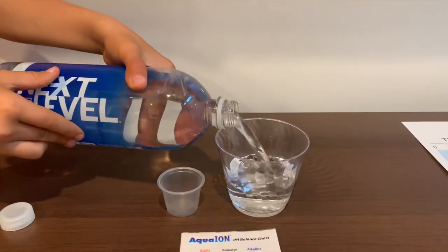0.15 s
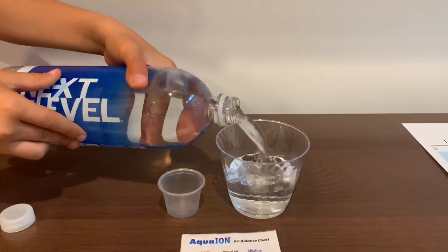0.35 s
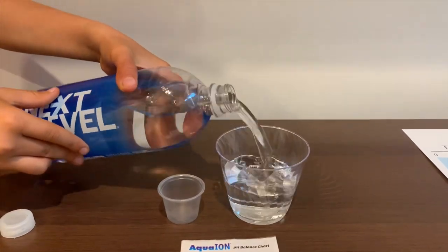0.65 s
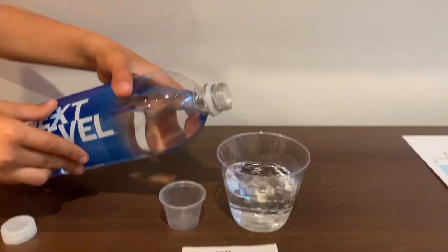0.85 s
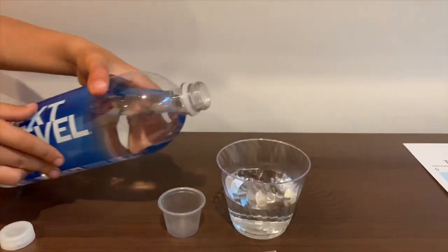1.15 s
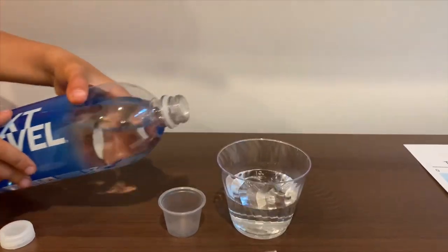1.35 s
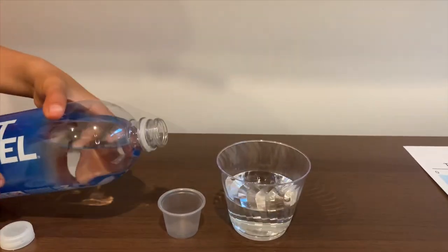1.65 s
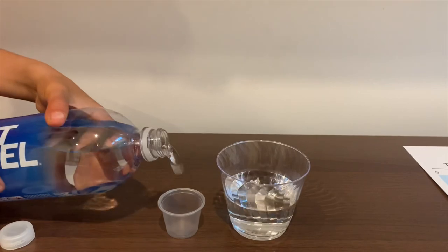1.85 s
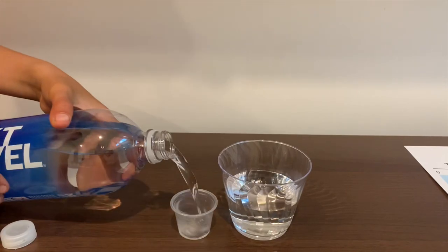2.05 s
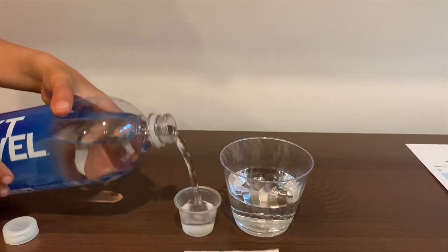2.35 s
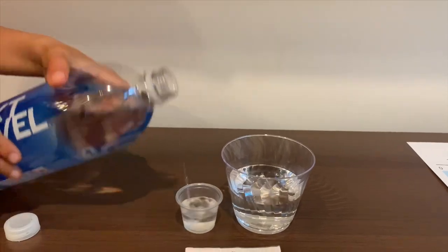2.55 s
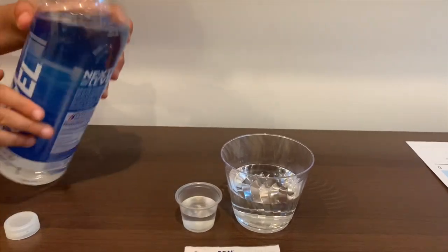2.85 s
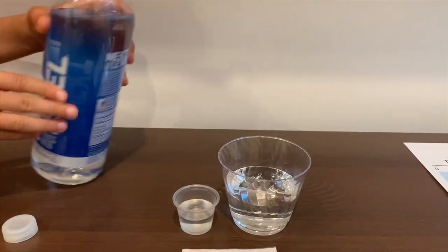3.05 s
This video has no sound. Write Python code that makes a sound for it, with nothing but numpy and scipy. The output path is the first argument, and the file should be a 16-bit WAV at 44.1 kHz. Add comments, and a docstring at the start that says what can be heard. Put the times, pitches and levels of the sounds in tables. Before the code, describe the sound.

Water pours from a plastic bottle into a half-full plastic cup, with irregular glugs, bright bubble plinks and ticking drops until about 0.9 seconds. Soft table bumps come near 0.9 and 1.4. A thin stream patters into a small empty cup from 2.0 to 2.6, its faint note rising, ending with drips. At 3.1 the bottle lands with a hollow wooden double thud. Low appliance hum and soft ventilation continue throughout.

```python
"""Water glugs from a plastic bottle into a half-full plastic cup, then a thin stream patters into a small empty one.
Gulps are noisy slaps through the cup's ringing; bubbles are dying tones that climb a little, big and fine.
Spray, splashes and patter are short bursts of coloured noise, and a faint blurred note climbs as the cup fills.
The wooden table is bumped twice and sways, and at the end the bottle is set down on it: dying tones and noise.
An appliance hums in the small room, as wavering tones over soft ventilation noise."""
import sys
import numpy as np
from scipy import signal
from scipy.fft import rfft, irfft
from scipy.io import wavfile
from scipy.ndimage import uniform_filter1d, map_coordinates

SR = 44100
rng = np.random.default_rng(int(sys.argv[2]) if len(sys.argv) > 2 else 0)


def dump(signal):
    """Clip the signal to [-1, 1] and save it as 16-bit WAV at the path in sys.argv[1]."""
    limited = np.clip(np.atleast_2d(signal).T, -1, 1)
    pcm = np.round(limited * 32767).astype(np.int16)
    wavfile.write(sys.argv[1], SR, pcm)


N = 141120

# hum tones of the appliance (f/Hz, level/dB, waver as a share)
HUM_TONES = [(56.5, -59.5, 1), (115.6, -62, 0.12), (169.44, -49.5, 0.35), (361.4, -73, 0.85),
             (595, -71, 0.21), (874, -79, 0.18)]
# how fast the hum wavers, as a spectrum (f/Hz, level/dB)
HUM_WAVER = [(1, 0), (6, -3), (16, -20), (60, -90)]
# colour of the ventilation noise (f/Hz, relative level/dB per Hz)
AIR_COLOUR = [(20, -2.5), (35, -15), (52, 5), (80, -2.5), (130, -8.5), (200, -2.5), (260, -10),
              (350, -11.5), (450, -17.5), (650, -18.5), (1000, -27), (2000, -38), (3500, -47.5),
              (9000, -50), (15000, -56.5)]
AIR_DB = -52
# how alike left and right are (f/Hz, likeness from 0 to 1)
LIKENESS = [(60, 0.99), (130, 0.74), (290, 0.84), (640, 0.45), (1400, 0.011), (15000, 0.035)]
# how long the room's tail lasts (f/Hz, t60/s: time to fall 60 dB)
ROOM_T60 = [(100, 0.77), (400, 0.34), (1500, 0.42), (4000, 0.37), (8000, 0.25), (16000, 0.23)]
EARLY_S = 0.0004  # the quick scatter starts after this
# echoes off the cup's wall, the table and the wall behind (left delay/s, right delay/s, level/dB)
ECHOES = [(.0009, .00096, -13), (.0023, .0022, -19.5), (.0049, 0.0046, -14)]
EDGE_HZ = 15900  # the treble is cut off here

# knocks on the table (t/s, level/dB, sway/dB before doubling, contact click/dB)
KNOCKS = [(0.896, -32.5, -36.5, -60), (0.9423, -37.5, -41.5, -84), (1.411, -34, -38, -64),
          (1.459, -38.5, -37, -72), (3.0743, -21, -18.5, -43), (3.141, -28, -50, -52.5),
          (3.187, -27, -25.5, -53)]
# tones the table top rings with (f/Hz, relative level/dB, t60/s)
TABLE_MODES = [(173, -3.5, 0.095), (214, -8, 0.16), (349.3, -2, 0.091), (421, -12, 0.15), (497, -26, 0.092),
               (617, -7, 0.08), (786, -12.5, 0.049), (898, -12.5, 0.051), (1108, -24, 0.15),
               (1280, -27, 0.074), (1595, -19, 0.084)]
# colour of the rattle (f/Hz, level/dB)
RATTLE_COLOUR = [(100, 2), (240, 3.5), (350, -10), (700, -11), (1500, -14.5), (2500, -21.5), (4000, -25.5),
                 (8000, -45.5), (16000, -60)]
RATTLE_DB, RATTLE_T60_S, RATTLE_RISE_S = -10, 0.16, 0.007  # level is relative to the knock
# the blow itself: a hollow tone inside a short bell-shaped swell
THOCK_HZ, THOCK_DB, THOCK_PEAK_S, THOCK_WIDTH_S = 420, 3.5, 0.0025, 0.0017
THOCK_DELAY_S = 0.00079
SWAY_HZ, SWAY_T60_S, SWAY_RISE_S, SWAY_LAG_S = 43.8, 0.4, 0.0051, 0.0093

# drops of spray on plastic (t/s, level/dB, brightest f/Hz)
TICKS = [(0.266, -61, 12900), (0.374, -53, 12200), (0.596, -53.5, 9000), (0.644, -46.5, 11000),
         (0.648, -47, 7160), (0.665, -38.5, 8450), (0.681, -51, 8000), (0.6883, -46.5, 10100),
         (0.8104, -56.5, 15600), (0.8818, -49.5, 9700), (1.053, -57, 6960), (1.1218, -61, 8900),
         (1.1623, -53.5, 8000), (1.281, -66, 12400), (1.993, -47, 10800), (1.995, -45.5, 8950),
         (2.069, -50, 9100), (2.2252, -57.5, 11300), (2.461, -77, 12330), (2.548, -44.5, 8700),
         (2.597, -58, 13040), (2.6277, -52.5, 15500), (2.8077, -60.5, 8300)]
# colour of a tick before it is tilted towards its brightest pitch (f/Hz, level/dB)
TICK_COLOUR = [(1500, -2.5), (4000, 6), (5500, 5.5), (7300, 10.5), (9000, 1.5), (10500, -17.5),
               (12500, 7.5), (16000, -5)]
TICK_T60_S, TICK_OCTAVES = 0.009, 0.65  # 6 dB weaker for each TICK_OCTAVES away from the brightest pitch

# water drumming on the small cup's thin floor and wall (t/s, level/dB, t60/s)
PATTERS = [(1.993, -51.5, 0.12), (2.011, -53, 0.26), (2.03, -57, 0.18), (2.551, -40.5, 0.029),
           (2.571, -50, 0.042), (2.595, -47.5, 0.07), (2.602, -42, 0.052), (2.607, -56, 0.03),
           (2.623, -56.5, 0.28)]
# colour of the drumming (f/Hz, level/dB)
PATTER_COLOUR = [(150, 9), (450, -2), (750, 3.5), (1200, -6), (1550, 2), (1750, -11.5), (2100, -7.5),
                 (4300, -22), (5600, -25.5), (7200, -38), (10500, -60), (13000, -22.5), (16000, -22.5)]
# wet splashes of the stream on the water (t/s, level/dB, t60/s)
SPLASHES = [(0.104, -49, 0.037), (0.153, -51, 0.021), (2.005, -64.5, 0.083), (2.179, -53, 0.059),
            (2.224, -56.5, 0.071), (2.24, -56.5, 0.13), (2.594, -51, 0.077), (2.602, -43.5, 0.061),
            (2.624, -64, 0.32)]
# colour of the splashes (f/Hz, level/dB)
SPLASH_COLOUR = [(800, 9.5), (1500, 1), (3000, 4), (4400, 3.5), (5500, -25), (7500, -14), (16000, -67)]
# the note of the air in the small cup as it fills (t/s, f/Hz, level/dB of its blur)
FILLING = [(2.2, 620, -76), (2.32, 720, -69), (2.39, 860, -62), (2.45, 890, -65), (2.52, 960, -82)]
# the slow noise that blurs that note (f/Hz, level/dB)
FILLING_BLUR = [(1, 0), (50, 0), (130, -18), (400, -70)]

# loudness of the fine bubbles under the stream (t/s, level/dB)
FLOW = [(0, -62.5), (.14, -71), (.3, -74.5), (.45, -69), (.7, -70.5), (.9, -76), (1.05, -82), (1.3, -80.5),
        (1.95, -96), (2.05, -80), (2.3, -87), (2.45, -81.5), (2.65, -78.5), (2.9, -85)]
# colour of the fine bubbles (f/Hz, level/dB)
FIZZ_COLOUR = [(600, 4.5), (1200, -8.5), (2000, -7), (3500, -1.5), (5200, -7.5), (7500, 0), (10000, -29.5),
               (14000, -7)]
FIZZ_PER_S, FIZZ_SPREAD_DB, FIZZ_RISE_S = 1600, 4.5, 0.0003
FIZZ_T60_S = 0.009  # for a bubble at 2000 Hz

# loudness of the mid-sized bubbles churning in the big cup (t/s, gain/dB)
GURGLE_LEVEL = [(0, -63.5), (.12, -62.5), (.3, -70.5), (.42, -67), (0.601, -66.5), (.72, -60.5), (.9, -61),
                (1.0, -73), (1.149, -80)]
GURGLE_COUNT, GURGLE_T60_S = 200, 0.028
GURGLE_HZ, GURGLE_OCTAVES, GURGLE_SPREAD_DB = 1750, 0.42, 3.5  # middle pitch, random spread of pitch and level

# single bubbles (t/s, f/Hz at the start, level/dB before flutter, t60/s)
BUBBLES = [(0.083, 3620, -53, 0.063), (0.106, 2560, -51, 0.023), (0.153, 3790, -53, 0.027),
           (0.208, 303, -63, 0.13), (0.206, 1213, -33.5, 0.012), (0.208, 1987, -50.5, 0.033),
           (0.209, 2300, -49.5, 0.033), (0.376, 1345, -41.5, 0.021), (0.378, 395, -44, 0.11),
           (0.388, 3640, -49.5, 0.027), (0.390, 3310, -43.5, 0.017), (0.4951, 3102, -41, 0.025),
           (0.498, 3216, -42.5, 0.03), (0.495, 642, -45, 0.24), (0.498, 7860, -53, 0.023),
           (0.5642, 7470, -52.5, 0.017), (0.686, 342, -43, 0.21), (0.689, 1834, -45, 0.045),
           (0.694, 1584, -42.5, 0.025), (0.746, 1630, -53.5, 0.081), (0.848, 1856, -39.5, 0.019),
           (0.871, 2830, -42.5, 0.019), (0.874, 2424, -45, 0.061), (0.884, 1910, -43, 0.022),
           (2.245, 3530, -63, .04), (2.603, 2866, -55, 0.028), (2.623, 465, -44, 0.066),
           (2.676, 444, -47, 0.059)]
BUBBLE_RISE_S = 0.00099
BUBBLE_GLIDE = 0.028  # share the pitch climbs in one t60; it stops after two
BUBBLE_WOBBLE, BUBBLE_FLUTTER_DB = 0.045, 3  # churning water shakes the pitch (share) and the level

# gulps landing in the big cup (t/s, level/dB before length scaling, length/s, highest f/Hz)
GULPS = [(0.172, -48.5, 0.05, 1310), (0.202, -36.5, 0.0065, 1400), (0.206, -40, 0.008, 2130),
         (0.342, -49.5, 0.008, 910), (0.371, -38.5, 0.011, 1874), (0.494, -41.5, 0.0046, 1900),
         (0.516, -45.5, 0.0033, 2300), (0.646, -46.5, 0.008, 1440), (0.681, -48, 0.015, 3305),
         (0.848, -50.5, 0.043, 2300)]
# water and cup ring with (f/Hz, width/Hz, relative level/dB)
CUP_MODES = [(301, 122, 14), (413.7, 270, 5), (650.5, 45, 4), (801, 77, 0), (1083, 140, -5),
             (1315, 95, -4.5), (1638, 155, 3), (1935, 69, 3.5), (2325, 34, 0.5), (2835, 960, 7)]


def amp(db):
    """Turns decibels into gain."""
    return 10 ** (np.asarray(db) / 20)


def unit(x):
    """Scales a sound to an rms (average strength) of 1."""
    return x / np.sqrt(np.mean(x ** 2) + 1e-20)


def read(points, hz):
    """Reads a table between its points, on a log-frequency axis."""
    f, value = np.transpose(points)
    return np.interp(np.log(hz + 1), np.log(f + 1), value)


def add(mix, s, sound):
    """Mixes a sound in at time s."""
    part = mix[max(round(s * SR), 0):][:len(sound)]
    part += sound[:len(part)]


def clock(size):
    """Gives the sample times in seconds."""
    return np.arange(size) / SR


def fade(t, t60):
    """Falls 60 dB in t60 seconds."""
    return np.exp(-np.log(1000) * t / t60)


def noise(colour, size):
    """Makes noise of rms 1 with the given spectrum and random phases."""
    hz = np.fft.rfftfreq(size, 1 / SR)
    phases = np.exp(2j * np.pi * rng.random(len(hz)))
    return unit(irfft(amp(read(colour, hz)) * phases, size))


def pair(x):
    """Blends two unrelated channels into left and right, nearly alike in the bass."""
    z = rfft(x)
    same = np.clip(read(LIKENESS, np.fft.rfftfreq(x.shape[1], 1 / SR)), 0, 1)
    mid = z[0] * np.sqrt((1 + same) / 2)
    side = z[1] * np.sqrt((1 - same) / 2)
    return irfft(np.array([mid + side, mid - side]), x.shape[1])


def background():
    """Hum tones waver in strength and phase over soft ventilation noise."""
    t, hum = clock(N), np.zeros(N)
    for hz, db, waver in HUM_TONES:
        a, b = (noise(HUM_WAVER, N) for _ in range(2))
        wavering = 1 + waver * (a + 1j * b) / np.sqrt(2)
        tone = np.exp(2j * np.pi * (hz * t + rng.random()))
        hum += amp(db) * np.sqrt(2) * (wavering * tone).real
    air = pair(np.array([noise(AIR_COLOUR, N), noise(AIR_COLOUR, N)]))
    return hum + amp(AIR_DB) * air


def room(x, early_db, early_t60, tail_db, left_db, lag_s):
    """Adds quick scatter from cups and bottle and a small room's tail; the left side hears it all lag_s later."""
    t = clock(size=24576)
    taps = rng.standard_normal((2, len(t)))
    # the tail is noise in which each pitch dies at its own speed
    hz, when, z = signal.stft(taps, SR, nperseg=256)
    dying = z * fade(when, read(ROOM_T60, hz)[:, None])
    tail = signal.istft(dying, SR, nperseg=256)[1][:, :len(t)]
    tail = tail * np.minimum(t / 0.0028, 1)
    early = rng.standard_normal(taps.shape) * (t > EARLY_S) * fade(t, early_t60)
    echoes = pair(amp(early_db) * unit(early) + amp(tail_db) * unit(tail)) / np.sqrt(len(t))
    both = x + signal.fftconvolve(np.atleast_2d(x), echoes, axes=1)[:, :N]
    left = map_coordinates(both[0], [np.arange(N) - lag_s * SR], order=5)
    return np.array([left, both[1]]) * amp([[left_db / 2], [-left_db / 2]])


def echoed(x):
    """Adds distinct echoes of nearby surfaces, timed differently on each side."""
    out = np.array([x, x])
    for left_s, right_s, db in ECHOES:
        add(out[0], left_s, amp(db) * x)
        add(out[1], right_s, amp(db) * x)
    return out


def sway():
    """After a knock the whole table wobbles with a deep, dying thud."""
    out, t = np.zeros(N), clock(size=30000)
    swell = 1 - np.exp(-t / SWAY_RISE_S)
    thud = 2 * swell * fade(t, SWAY_T60_S) * np.sin(2 * np.pi * SWAY_HZ * t)
    for s, _, db, _ in KNOCKS:
        add(out, s + SWAY_LAG_S, -amp(db) * thud)
    return out


def tick(bright_hz):
    """A very short snap of thin plastic: noise strongest around one pitch."""
    t = clock(size=2048)
    colour = [(hz, db - 6 * abs(np.log2(hz / bright_hz)) / TICK_OCTAVES) for hz, db in TICK_COLOUR]
    return noise(colour, len(t)) * np.minimum(t / 0.00015, 1) * fade(t, TICK_T60_S)


def knocks():
    """A contact click comes first, then a hollow thock, the table top's ringing and a dull rattle."""
    out, t = np.zeros(N), clock(size=16384)
    wood = sum(amp(db) * fade(t, t60) * np.sin(2 * np.pi * hz * t) for hz, db, t60 in TABLE_MODES)
    swell = np.exp(-((t - THOCK_PEAK_S) / THOCK_WIDTH_S) ** 2)
    thock = amp(THOCK_DB) * swell * np.sin(2 * np.pi * THOCK_HZ * t)
    for s, db, _, click_db in KNOCKS:
        rattle = amp(RATTLE_DB) * noise(RATTLE_COLOUR, len(t)) * fade(t, RATTLE_T60_S)
        add(out, s, amp(db) * rattle * np.minimum(t / RATTLE_RISE_S, 1))
        add(out, s + THOCK_DELAY_S, -amp(db) * (thock + wood) * np.minimum(t / 0.001, 1))
        add(out, s - 0.001, amp(click_db) * tick(bright_hz=6760))
    return out


def spray():
    """Stray drops tick on the plastic cups."""
    out = np.zeros(N)
    for s, db, hz in TICKS:
        add(out, s, amp(db) * tick(hz))
    return out


def patter(bursts, colour, grain_db):
    """A thin stream lands in bursts of noise, grainy in level and dying away."""
    out, t = np.zeros(N), clock(size=12000)
    for s, db, t60 in bursts:
        bumps = unit(uniform_filter1d(rng.standard_normal(len(t)), size=90))
        grains = unit(amp(grain_db * bumps))
        burst = noise(colour, len(t)) * grains * np.minimum(t / 0.0004, 1) * fade(t, t60)
        add(out, s, amp(db) * burst)
    return out


def filling():
    """The air in the small cup gives a faint blurred note that climbs as the cup fills."""
    s, hz, db = np.transpose(FILLING)
    t = clock(N)
    blur = noise(FILLING_BLUR, N)
    note = np.sin(2 * np.pi * np.cumsum(np.interp(t, s, hz)) / SR)
    return np.interp(t, s, amp(db), left=0, right=0) * blur * note


def bubble(hz, t60, rise_s):
    """A trapped bubble swells into a wobbling, dying tone that climbs as it nears the surface."""
    t = clock(size=6000)
    wobble, flutter = unit(uniform_filter1d(rng.standard_normal((2, len(t))), size=110))
    climb = BUBBLE_GLIDE * np.minimum(t / t60, 2)
    turns = np.cumsum(hz * (1 + climb + BUBBLE_WOBBLE * wobble)) / SR
    shape = (1 - np.exp(-(t / rise_s) ** 2)) * fade(t, t60)
    return shape / shape.max() * amp(BUBBLE_FLUTTER_DB * flutter) * np.sin(2 * np.pi * turns)


def fizz():
    """Many tiny bubbles at random times follow the flow; small, high ones die sooner."""
    out = np.zeros(N)
    pitches = np.geomspace(600, 14000, 48)
    for hz in pitches:
        starts = rng.random(N) < FIZZ_PER_S / len(pitches) / SR
        hits = starts * amp(FIZZ_SPREAD_DB * np.minimum(rng.exponential(1, N), 4))
        tiny = bubble(hz, FIZZ_T60_S * (2000 / hz) ** 0.63, FIZZ_RISE_S)
        out += amp(read(FIZZ_COLOUR, hz)) * signal.oaconvolve(hits, tiny)[:N]
    return unit(out) * amp(np.interp(clock(N), *np.transpose(FLOW)))


def gurgle():
    """Overlapping bubbles of random pitch and strength churn at random times around the gulps."""
    out = np.zeros(N)
    times = rng.uniform(0, GURGLE_LEVEL[-1][0], GURGLE_COUNT)
    draws = rng.standard_normal((GURGLE_COUNT, 2)).clip(-2, 2)
    for s, (pitch, strength) in zip(times, draws):
        hz = GURGLE_HZ * 2 ** (GURGLE_OCTAVES * pitch)
        add(out, s, amp(GURGLE_SPREAD_DB * strength) * bubble(hz, GURGLE_T60_S, BUBBLE_RISE_S))
    return out * amp(np.interp(clock(N), *np.transpose(GURGLE_LEVEL)))


def bubbles():
    """Single bubbles ring as clearly heard plinks."""
    out = np.zeros(N)
    for s, hz, db, t60 in BUBBLES:
        add(out, s, amp(db) * bubble(hz, t60, BUBBLE_RISE_S))
    return out


def gulps():
    """Each slug of water is a short flurry of slaps that rings the cup up to the slug's highest pitch."""
    out, t = np.zeros(N), clock(size=4096)
    for s, db, length, top_hz in GULPS:
        push = np.minimum(t / 0.0037, 1) * np.exp(-np.maximum(t - length, 0) / 0.0023)
        slug = np.zeros(len(t))
        for hz, width, mode_db in CUP_MODES:
            # a randomly drifting phase makes the slaps as wide in pitch as the ringing
            start = 2 * np.pi * rng.random()
            drift = np.cumsum(rng.standard_normal(len(t))) * np.sqrt(2 * np.pi * width / SR)
            slaps = np.exp(1j * (start + drift))
            ring = signal.lfilter([1], [1, -np.exp(-np.pi * width / SR)], push * slaps)
            tone = unit((ring * np.exp(2j * np.pi * hz * t)).real)
            slug += amp(mode_db) / np.sqrt(1 + (hz / top_hz) ** 16) * tone
        add(out, s, amp(db) * unit(slug) * np.sqrt(length / t[-1]))  # longer slugs carry more energy
    return out


def scene():
    """Puts water, plastic, table and hum together in one small room."""
    plinks = room(echoed(bubbles() + gurgle()),
                  early_db=-5.5, early_t60=0.039, tail_db=-6, left_db=2, lag_s=0.00002)
    glugs = room(echoed(gulps()), early_db=-1.5, early_t60=0.017, tail_db=-4, left_db=0, lag_s=0.0001)
    fine = room(fizz(), early_db=4, early_t60=0.07, tail_db=-5.5, left_db=-0.5, lag_s=0.00006)
    splashes = room(patter(SPLASHES, SPLASH_COLOUR, grain_db=1.5),
                    early_db=-4, early_t60=0.0085, tail_db=-9, left_db=0, lag_s=-0.00013)
    drops = room(spray(), early_db=2, early_t60=0.022, tail_db=-3, left_db=-1, lag_s=0.00007)
    drumming = room(patter(PATTERS, PATTER_COLOUR, grain_db=1),
                    early_db=3.5, early_t60=0.022, tail_db=-2, left_db=1.5, lag_s=-0.00013)
    table = room(knocks(), early_db=-16.5, early_t60=0.051, tail_db=-7, left_db=2.5, lag_s=-0.00011) + sway()
    water = plinks + glugs + fine + splashes + filling()
    return water + drops + drumming + table + background()


def record(dry):
    """Cuts off the treble above EDGE_HZ."""
    lowpass = signal.firwin(511, EDGE_HZ, window=("kaiser", 9), fs=SR)
    return signal.oaconvolve(dry, lowpass[None], "same")


dry = scene()
out = record(dry)
dump(out)
```